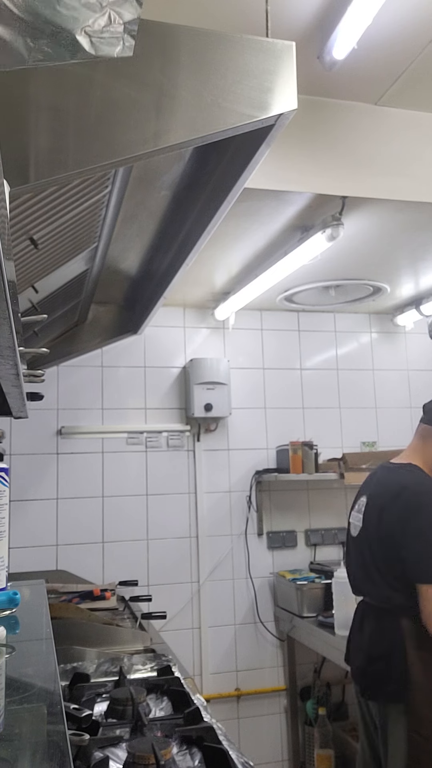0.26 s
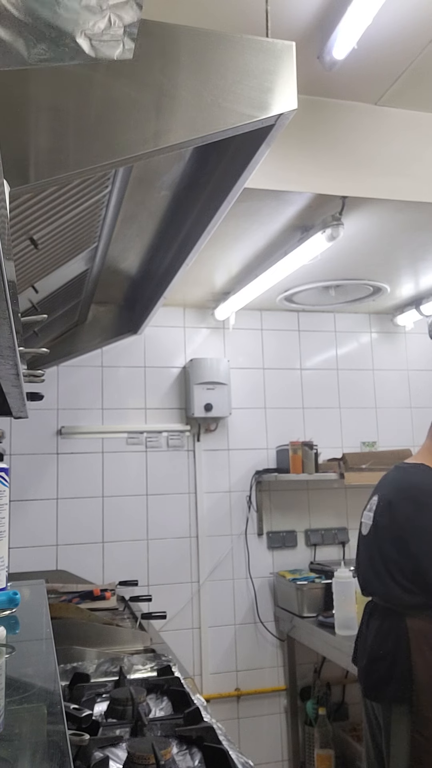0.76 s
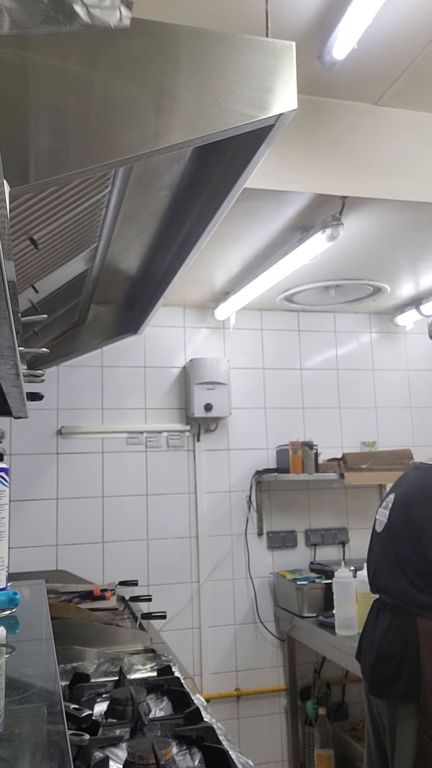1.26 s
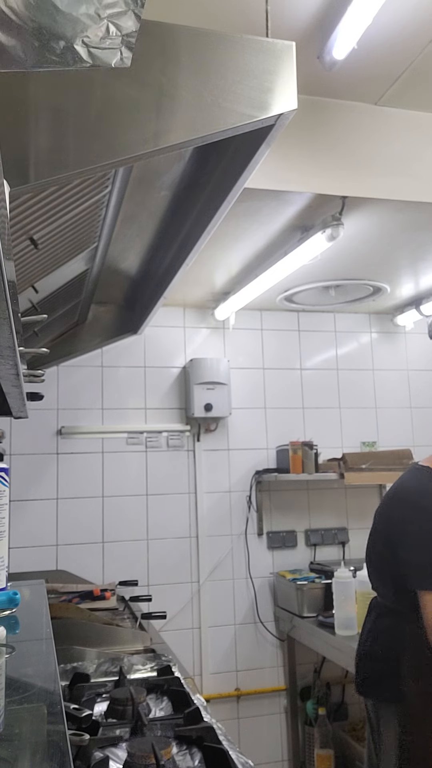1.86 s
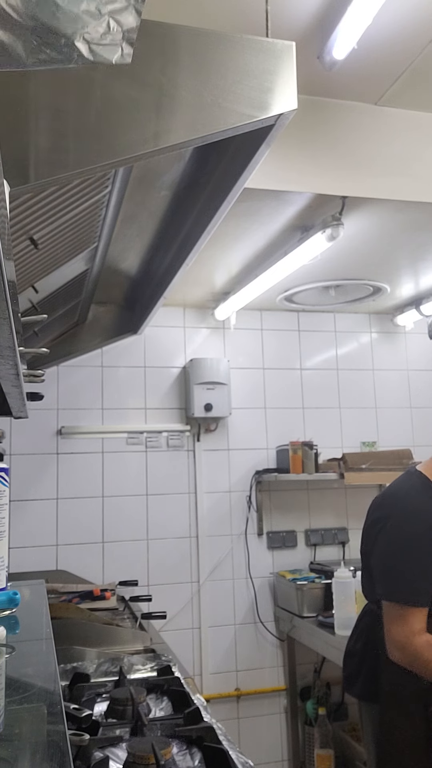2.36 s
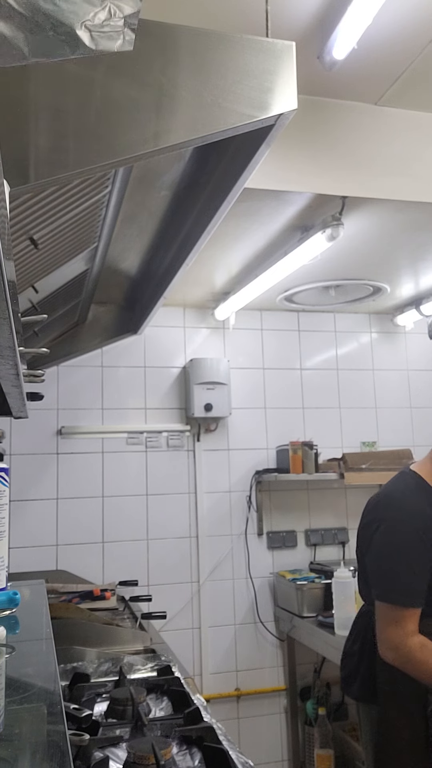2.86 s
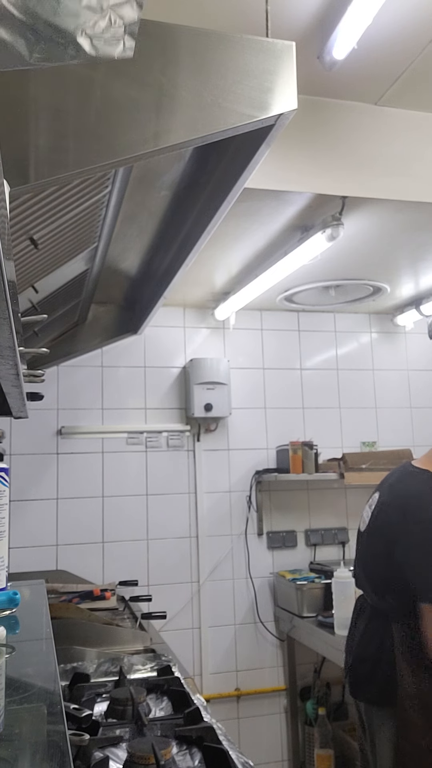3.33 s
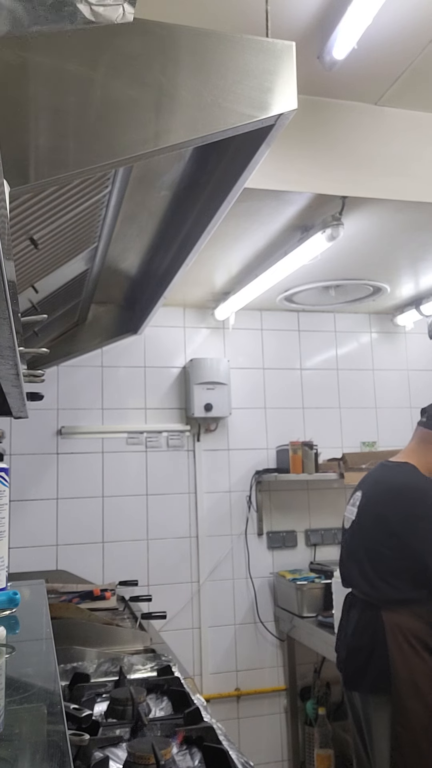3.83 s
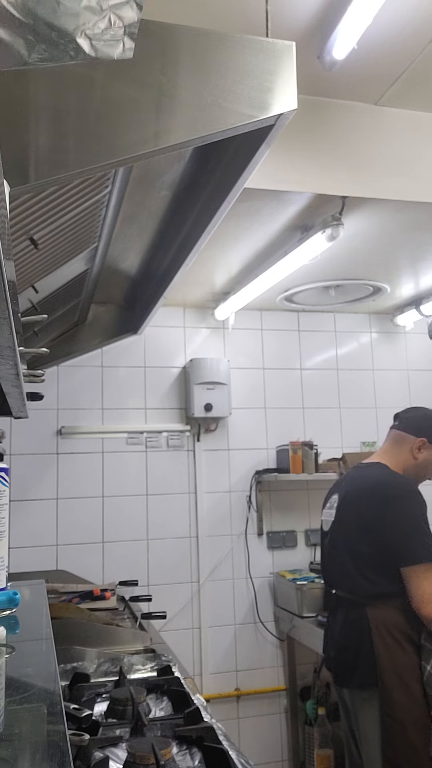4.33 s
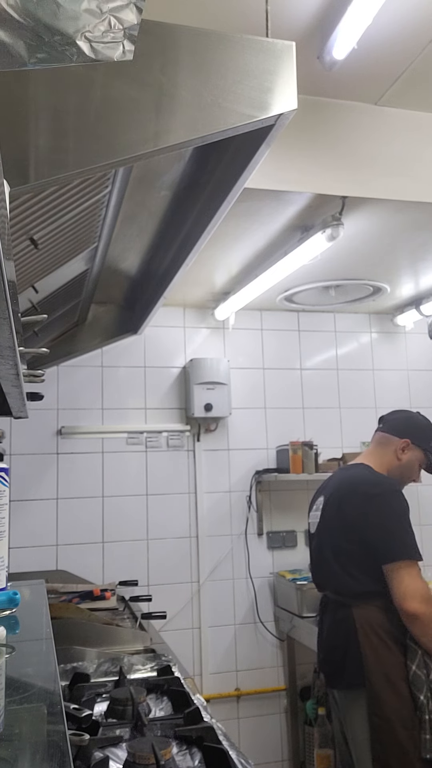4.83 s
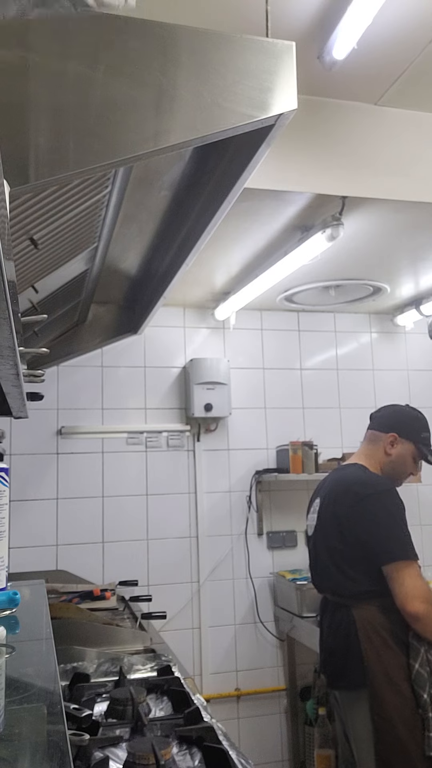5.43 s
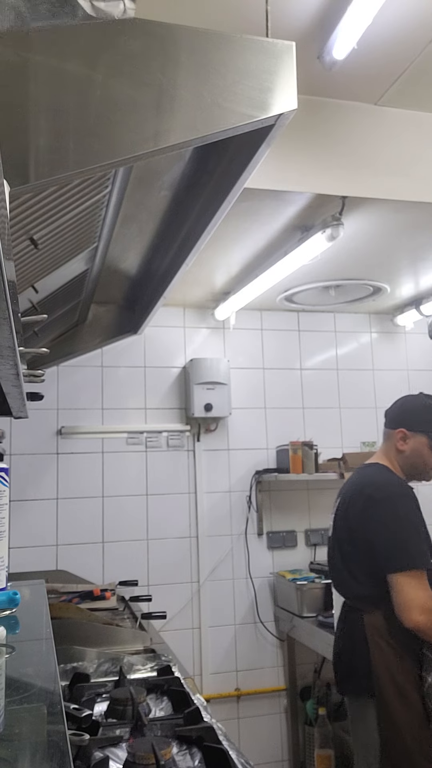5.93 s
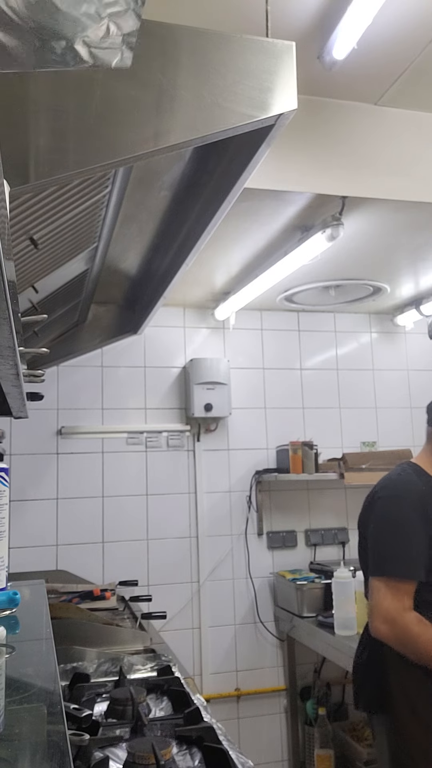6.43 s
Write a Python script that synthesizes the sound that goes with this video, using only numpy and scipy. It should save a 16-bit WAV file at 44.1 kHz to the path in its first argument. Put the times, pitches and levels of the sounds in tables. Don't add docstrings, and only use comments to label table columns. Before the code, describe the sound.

Under a commercial kitchen hood, heavy bass air rush dominates and never stops. A cook nearby handles crackly plastic, drops loose pieces into a metal container with a sharp clatter and dull boom, and shoves them about for a second or so. Later come isolated crinkles, ticks and tiny high clinks, busier near the end. Wide stereo pickup, slightly dull top, brief reflections from tile and steel.

```python
import sys
import numpy as np
from scipy import signal
from scipy.fft import rfft, irfft
from scipy.io import wavfile
from scipy.ndimage import uniform_filter1d

SR = 44100
rng = np.random.default_rng(int(sys.argv[2]) if len(sys.argv) > 2 else 0)


def transcribe(u):
    v = np.clip(np.atleast_2d(u).T, -1, 1)
    q = np.round(v * 32767).astype(np.int16)
    wavfile.write(sys.argv[1], SR, q)


def gain_from_decibels(decibels):
    exponent = np.asarray(decibels, float) / 20
    return 10 ** exponent


N = 295029
T = np.arange(N) / SR
HZ = np.maximum(np.arange(N // 2 + 1) * SR / N, 1)


def level(x, db=0):
    return x * gain_from_decibels(db) / np.sqrt(np.mean(x ** 2))


def along(table, col=1):
    table = np.array(table, float)
    return np.interp(np.log(HZ), np.log(table[:, 0]), table[:, col])


def colour(x, table):
    return level(irfft(rfft(x) * gain_from_decibels(along(table)), N))


def walk(rate_hz):
    hold = int(SR / rate_hz)
    steps = np.repeat(rng.standard_normal(N // hold + 1), hold)
    v = uniform_filter1d(uniform_filter1d(steps, hold), hold)[:N]
    return (v - v.mean()) / v.std()


def grains(spread_db):
    return rng.standard_normal((2, N)) * gain_from_decibels(spread_db * rng.exponential(size=(2, N)))


def ports(pair, share, lag_s=0.000476):
    late = irfft(rfft(pair[0]) * np.exp(-2j * np.pi * HZ * lag_s), N)
    return np.array([pair[0], share * late + np.sqrt(1 - share ** 2) * pair[1]])


# f/Hz, density/dB per Hz
AIR_RUSH = [(20, -45), (31, -31), (38, -18), (50, -3.5), (140, -4), (175, -13.5), (240, -13.5),
            (400, -19.5), (520, -25), (1100, -38), (1900, -40), (2300, -36), (4700, -48.5), (8000, -53.5),
            (16000, -45)]
# f/Hz, width/Hz, level/dB
DUCT_MODES = [(53.2, 13.3, 5), (78.4, 20, 2), (103.8, 15.5, 5), (134.5, 16.7, 6), (69.5, 6, 0.5),
              (115, 16, -6.5), (172, 5.2, 3), (187, 10, -2.5), (194.2, 10, 11.5), (282, 33, 2),
              (205, 17, 4), (233.3, 26.5, 7.5), (260.2, 7.6, -6), (253, 13, -5.5), (311.6, 35, 4),
              (346, 8.4, 3), (380, 13, 5.5), (408, 24, -1), (403, 8.8, 3), (441, 6.3, 4), (450, 20, 5.5),
              (478, 13, 1), (595, 13, -2), (705, 71, 2.5), (796, 19, 6.5), (856, 19, 6.5),
              (2320, 280, -0.5)]
# f/Hz, correlation/1, left lead/rad
PORT_LIKENESS = [(40, 0.92, 0.53), (70, 1, 0.42), (130, 0.98, 0.21), (290, 0.99, 0.24), (443, 0.91, 0.31),
                 (517, 0.93, 0.35), (680, 0.51, 0.15), (815, 0.2, 0.64), (1090, 0.035, 2.7),
                 (1400, 0.31, 3.9), (2170, 0.066, 4.86), (16000, .03, 7.2)]
# t/s, level/dB
LOW_RUSH_LEVEL = [(0.0, -22), (0.3, -27), (1.08, -16.5), (1.15, -22.5), (2.16, -22), (2.29, -31.5),
                  (2.38, -24), (2.91, -20.5), (2.94, -15), (3.13, -26), (3.56, -20), (4.08, -23.5),
                  (5.5, -18), (5.7, -24.5), (6.09, -14), (6.2, -30.5), (6.28, -17.5), (6.69, -19.5)]
OCTAVE_SHARES = (0.4, 0.92, 0.097)


def air_in_duct():
    lift = 1 + sum((gain_from_decibels(db) - 1) / (1 + (2 * (HZ - hz) / width) ** 2) for hz, width, db in DUCT_MODES)
    alike = np.clip(along(PORT_LIKENESS), -.999, .999)
    noise = rfft(rng.standard_normal((2, N))) * gain_from_decibels(along(AIR_RUSH)) * lift
    mid, side = noise * np.sqrt([1 + alike, 1 - alike])
    right_lag = np.exp(-1j * along(PORT_LIKENESS, col=2))
    pair = np.array([mid + side, (mid - side) * right_lag])
    s, db = np.transpose(LOW_RUSH_LEVEL)
    low_rush_db = np.interp(T, s, db - db.mean())
    wavers = [share * low_rush_db + 0.5 * walk(3.45) for share in OCTAVE_SHARES] + [0] * 6
    common_db = 0.15 * walk(0.19) + 0.13 * (T - T.mean())
    rush = 0
    for octave, waver_db in enumerate(wavers):
        part = np.clip(1 - np.abs(np.log2(np.maximum(HZ, 50) / 50) - octave), 0, 1)
        flicker_db = 0.6 * walk(6)
        rush = rush + irfft(pair * np.sqrt(part), N) * gain_from_decibels(waver_db + common_db + flicker_db)
    return level(rush, -20)


# f/Hz, wander/Hz, level/dB rms
BLADE_TONES = [
    (427.7, 1.1, -43),
    (100.4, 1.5, -35),
    (1069, 2, -68),
]


def blade_whine():
    whine = 0
    for hz, wander_hz, db in BLADE_TONES:
        loudness = np.sqrt(2) * gain_from_decibels(db + 1.2 * walk(5.38))
        phase = 2 * np.pi * np.cumsum(hz + wander_hz * walk(4)) / SR
        whine = whine + loudness * np.sin(phase)
    return whine


def hood():
    return air_in_duct() + blade_whine()


# f/Hz, density/dB per Hz
RATTLE_COLOUR = [(900, -26), (1300, 0), (1600, 3.5), (2400, 5.5), (3600, -1), (5000, -11.5), (7500, -16),
                 (9500, -37)]
# f/Hz, density/dB per Hz
BODY_COLOUR = [(330, -8.5), (480, 12.5), (600, 2.5), (700, 2.5), (850, -3), (1150, -6.5), (1600, -37)]
# f/Hz, density/dB per Hz
BOOM_COLOUR = [(150, -23), (220, -3), (280, 14), (350, -2), (480, -22)]
# t/s, rattle level/dB, settling/dB per s, body over rattle/dB
LOAD_SHOVES = [(0.733, -31.5, 130, -8), (.77, -40, 60, 1), (.8, -36.5, 65, 6), (.855, -45, 115, 10),
               (.91, -45.5, 50, 3), (.97, -39.5, 43, 1), (1.05, -42.5, 50, 9), (1.085, -44, 60, 6),
               (1.11, -44, 105, 4), (1.17, -50, 40, 4), (1.27, -52, 30, 3), (1.43, -51, 40, 3),
               (1.455, -42, 60, 4), (1.478, -45, 90, 10), (1.605, -44, 250, -1), (1.69, -45, 72, 4),
               (1.93, -43, 150, 3), (2.17, -45, 53, 6), (3.5, -47, 130, -8), (5.66, -48, 40, -6),
               (5.85, -54, 30, 8), (6.2, -54, 44, 3)]
LOAD_RISES = (0.017, 0.011, 0.0058)


def bin_load():
    power = np.zeros((3, N))
    rise = np.array(LOAD_RISES)[:, None]
    boom_over_db = 6.5
    for s, db, settle_db, body_db in LOAD_SHOVES:
        i = slice(int(s * SR), int(s * SR) + SR)
        t = T[i] - s
        peak_db = db + np.array([[0], [body_db], [boom_over_db]])
        fall_db = settle_db * np.maximum(t - rise, 0)
        power[:, i] += (np.minimum(t / rise, 1) * gain_from_decibels(peak_db - fall_db)) ** 2
    out = 0
    colours, shares = (RATTLE_COLOUR, BODY_COLOUR, BOOM_COLOUR), (.3, .7, .95)
    for table, share, gain in zip(colours, shares, np.sqrt(power)):
        pieces = ports(colour(grains(2.6), table), share, lag_s=0.00016)
        out = out + pieces * gain * gain_from_decibels(0.21 * walk(40.74))
    return out


def ring(hz, db, t60_s, rise_s, phase):
    t = T[:SR // 4]
    return gain_from_decibels(db - 60 * t / t60_s) * np.clip(t / rise_s, 0, 1) * np.sin(2 * np.pi * hz * t + phase)


def add(out, s, sound):
    i = int(s * SR)
    out[:, i:i + sound.shape[1]] += sound[:, :N - i]


# f/Hz, level/dB, t60/s
BIN_MODES = [(199, 1, 0.085), (282, 3.5, 0.066), (350, 1.5, 0.16), (453, -2.5, 0.14), (540, -4, 0.11),
             (581, -10, 0.1), (740, -10, 0.076), (840, -4, 0.17), (1150, -2, 0.055), (1270, -10, 0.28),
             (1500, -22, .07), (1600, -7.5, 0.1), (2060, -5, 0.054), (2340, -5, 0.07), (2900, -29, .06),
             (3540, -12, .05)]
# t/s, level/dB, rise/s, brightness/dB per octave
BIN_BLOWS = [(0.738, -41, 0.0034, 5), (.752, -42, .004, 10.5), (.772, -32, 0.0067, -12),
             (0.806, -39, 0.0046, 0), (.855, -38, 0.0072, 2), (0.896, -34, 0.008, 2.5),
             (0.972, -45, 0.0039, 2), (1.023, -30.5, 0.007, -9.5), (1.108, -35, 0.014, -5),
             (1.14, -35, 0.008, -6), (1.202, -37.5, 0.0083, -12), (1.466, -39, 0.015, -10),
             (1.495, -37, 0.013, -11), (2.184, -40, .004, 1), (2.24, -46, .005, 6.5)]


def blows():
    out = np.zeros((2, N))
    chance = rng.standard_normal((len(BIN_BLOWS), len(BIN_MODES), 4))
    for (s, db, rise_s, bright_db), row in zip(BIN_BLOWS, chance):
        for (hz, mode_db, t60_s), (size, pitch, left, right) in zip(BIN_MODES, row):
            phase = 3 * left + min(hz / 1200, 1) * np.array([[0], [2 * right]])
            struck_db = db + mode_db + bright_db * np.log2(hz / 600) + 1.8 * size
            add(out, s, ring(hz * (1 + .012 * pitch), struck_db, t60_s, rise_s, phase))
    return out


# t/s, f/Hz, level/dB, t60/s
SINGING_PANELS = [(.76, 282, -17, .3), (.8, 279, -16.5, 0.15), (.825, 336, -22, 0.18), (.74, 917, -33, .12),
                  (1.02, 236, -22, 0.17), (.96, 484, -33, 0.33), (1.1, 310, -21, 0.11),
                  (.742, 1600, -34, .12), (.745, 1480, -39, 0.1), (.75, 3330, -38, .08),
                  (.752, 2340, -34, .08), (.81, 520, -33, .3), (.862, 842, -36.5, 0.23),
                  (.89, 1190, -37, 0.074), (.89, 264, -16, 0.1), (.98, 1180, -36, 0.11),
                  (1.01, 852, -31, 0.1), (1.105, 834, -33, .3), (1.105, 740, -34, .25),
                  (1.12, 581, -29, 0.38), (1.135, 450, -33, .12), (1.21, 850, -36, 0.2),
                  (1.47, 1273, -42, .2), (1.48, 1424, -41, .2), (1.605, 1250, -39, 0.12)]


def panels():
    out = np.zeros((2, N))
    lag_s = 0.00018
    for s, hz, db, t60_s in SINGING_PANELS:
        add(out, s, ring(hz, db, t60_s, 0.0078, np.array([[0], [-2 * np.pi * hz * lag_s]])))
    return out


# t/s, f/Hz, level/dB, t60/s
SMALL_CLINKS = [(.976, 4800, -40, .06), (.977, 7500, -45, .06), (1.545, 6800, -42, .03),
                (1.546, 4800, -46, .05), (1.43, 3300, -43, .03), (1.465, 6600, -45, .05),
                (1.53, 4400, -47, .06), (5.662, 14800, -42, .02), (5.679, 14800, -39, .02),
                (5.679, 11300, -42, .02), (5.688, 6000, -42, .025), (5.698, 6500, -42, .025),
                (5.697, 14800, -41, .03), (5.709, 6500, -42, .025), (5.71, 4800, -42, .04),
                (4.315, 6500, -45, .03), (4.089, 6500, -47, .02), (4.412, 6500, -47, .02),
                (.738, 7600, -36, .06), (.745, 7100, -39, .06), (3.73, 5600, -45, .04),
                (6.52, 5500, -45, .03), (6.545, 3400, -45, .03), (1.755, 6600, -45, .06),
                (.752, 5700, -38, .03), (.766, 3300, -36, .03), (.76, 1700, -33, .05),
                (1.75, 4100, -46, .07), (3.988, 3500, -38, .02), (3.988, 4200, -41, .015),
                (3.987, 2700, -42, .015), (4.268, 3400, -39, .02), (4.268, 4200, -42, .015),
                (4.268, 5600, -46, .015), (4.34, 4050, -42, .04), (2.318, 3500, -43, .04),
                (2.335, 4000, -44, .03), (6.53, 4000, -43, .04), (3.73, 7500, -44, .04),
                (2.15, 6640, -51, 0.034), (3.687, 7500, -49, .05)]


def clinks():
    out = np.zeros((2, N))
    for s, hz, db, t60_s in SMALL_CLINKS:
        add(out, s, ring(hz, db, t60_s, 0.00051, np.array([[0], [1.2]])))
    return out


# f/Hz, density/dB per Hz
WRAP_TOP_COLOUR = [(2000, -12), (3200, -3), (4200, -4.5), (6500, 0), (10000, 3), (16000, 5)]
# f/Hz, density/dB per Hz
WRAP_LOW_COLOUR = [(900, -11), (1500, -8.5), (2200, 2), (3000, 5), (4000, 2), (6500, -4.5)]
# t/s, peak level/dB, fall/s, lower part/dB
WRAP_FOLDS = [(.029, -52, 0.026, -10), (.098, -41, 0.022, -4), (.736, -37.5, 0.025, 4.5),
              (.765, -48.5, 0.072, 4), (.973, -38.5, 0.024, -10), (1.11, -42.5, 0.02, -0.5),
              (1.209, -42, 0.024, -9), (1.289, -39.5, 0.029, -6), (1.318, -49, .025, -8),
              (2.215, -46, .026, -8), (2.313, -44, 0.036, -6), (2.647, -43, 0.032, -7),
              (2.911, -52.5, .021, -9), (3.685, -52, 0.025, -2), (3.724, -42.5, 0.029, -11),
              (5.414, -56, .016, -5), (5.468, -49, 0.038, 0), (5.87, -59, .024, -1),
              (6.037, -41.5, 0.03, -5), (6.635, -49.5, 0.028, -1), (.5, -56, 0.026, -12),
              (.85, -50, 0.023, -6)]
# t/s, peak level/dB, rise/s, lower part/dB
WRAP_SQUEEZES = [(.32, -54, .02, -11), (.386, -53.5, .02, -14), (1.455, -40.5, 0.021, -13),
                 (1.685, -44, 0.02, 0.5), (1.73, -38.5, 0.025, -6), (1.933, -49, 0.033, 3.5),
                 (2.175, -45, 0.019, -12), (3.502, -60, 0.034, 6), (4.06, -55, 0.02, -10),
                 (4.312, -47.5, .006, -4), (4.325, -41.5, 0.021, -4), (5.657, -40, .006, -10),
                 (5.672, -37.5, 0.017, -9), (5.698, -48, 0.013, -1), (5.952, -47, 0.018, -4),
                 (6.248, -57, 0.056, 7), (6.34, -56, .03, -10), (6.47, -48, 0.038, -10),
                 (6.515, -41, 0.025, -4)]
# t/s, peak level/dB
WRAP_TICKS = [(.08, -51), (1.079, -53), (1.429, -52), (1.512, -52), (1.544, -53), (1.83, -46), (2.148, -50),
              (2.359, -58), (2.42, -50), (2.543, -50), (2.733, -52), (3.634, -52), (4.175, -48),
              (4.265, -58), (4.41, -52), (4.727, -51), (5.291, -53)]


def wrap():
    top, low = np.zeros((2, N)), np.zeros((2, N))
    # t/s, peak level/dB, rise/s, fall/s, lower part/dB, snap/1
    rows = [(s, db, 0.29 * fall, fall, low_db, 0.3) for s, db, fall, low_db in WRAP_FOLDS]
    rows += [(s, db, rise, 0.033, low_db, 0) for s, db, rise, low_db in WRAP_SQUEEZES]
    rows += [(s, db, 0.0033, 0.0076, -7, 0.45) for s, db in WRAP_TICKS]
    pans_db = 1.0 * rng.standard_normal(len(rows))
    for (s, db, rise, fall, low_db, snap), pan_db in zip(rows, pans_db):
        i = slice(int(max(s - .005, 0) * SR), int((s + rise + 6 * fall) * SR))
        t = T[i] - s
        swell = 0.7 if snap else 0.75
        up = np.clip((t + 0.0014) / (rise + 0.0011), 0, 1) ** swell
        shape = up * gain_from_decibels(-9 * (np.maximum(t - rise, 0) / fall) ** 1.43)
        shape = shape + snap * (t > 0) * np.exp(-np.abs(t) / 0.0056)
        side = gain_from_decibels(np.array([[pan_db + 8.5], [-pan_db + 5.0]]) / 2)
        top[:, i] += gain_from_decibels(db + 5.0) * shape * side
        low[:, i] += gain_from_decibels(db + low_db) * shape * side
    crackle = gain_from_decibels(1.4 * walk(150))
    film = rfft(ports(colour(grains(1.5), WRAP_TOP_COLOUR), 0.17))
    bright = 0
    for hz in (3520, 5000, 6950, 10400, 14500):
        band = np.exp(-(np.log2(HZ / hz) / 0.37) ** 2)
        bright = bright + irfft(film * band, N) * gain_from_decibels(1.6 * walk(80))
    dull = ports(colour(grains(1.0), WRAP_LOW_COLOUR), 0.21)
    return crackle * (level(bright) * top + dull * low)


# t/s, level/dB
SIZZLE_LEVEL = [(0.0, -52), (0.13, -53), (0.47, -76), (0.76, -51), (0.93, -53), (1.19, -48.5), (1.3, -51),
                (2.29, -52.5), (2.48, -53.5), (3.93, -51), (4.4, -53), (5.63, -52), (6.17, -52), (6.3, -55),
                (6.52, -52), (6.69, -49)]
# f/Hz, density/dB per Hz
SIZZLE_COLOUR = [(1500, -9), (3500, 9), (6500, 8), (16000, 2)]


def sizzle():
    s, db = np.transpose(SIZZLE_LEVEL)
    hiss = ports(colour(grains(2.7), SIZZLE_COLOUR), 0.21)
    return hiss * gain_from_decibels(np.interp(T, s, db) + 0.34 * walk(23.5) + 3)


def room(x):
    t60_s, wash_db = 0.31, -11
    t = T[:SR]
    tail = rng.standard_normal((2, SR)) * gain_from_decibels(-60 * t / t60_s) * (t > .006)
    tail = tail / np.sqrt(np.sum(tail ** 2, axis=1, keepdims=True))
    return x + gain_from_decibels(wash_db) * signal.fftconvolve(x, tail, axes=1)[:, :N]


def scene():
    cook = wrap() + bin_load() + blows() + panels() + clinks()
    return hood() + sizzle() + room(cook)


def top_cut(x):
    return signal.sosfilt(signal.butter(12, 17000, fs=SR, output="sos"), x)


# f/Hz, mid level/dB, left minus right/dB
MIC_COLOUR = [(59, 0.5, -2.5), (207, -1.5, -0.5), (640, 2, -3.5), (1300, 6, 1), (2400, -0.5, 1),
              (4700, 3, -2), (7570, -1.5, -5.5), (8480, -9.5, 1), (10300, -8.5, -3.5), (12200, -6.5, -9),
              (14400, -8, -4.5), (14900, -4.5, -9), (15800, -9, 1)]


def record(dry):
    half_each = np.array([[.5], [-.5]])
    gain = gain_from_decibels(along(MIC_COLOUR) + half_each * along(MIC_COLOUR, col=2)) * (HZ < 15870)
    mix = irfft(rfft(dry) * gain, N)
    return top_cut(mix)


dry = scene()
out = record(dry)
transcribe(out)
```